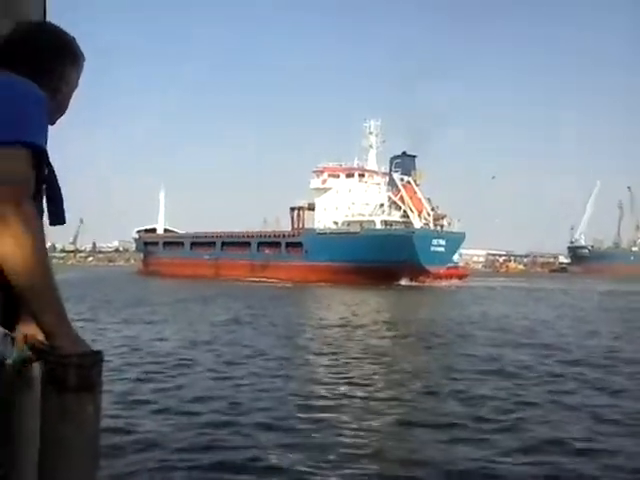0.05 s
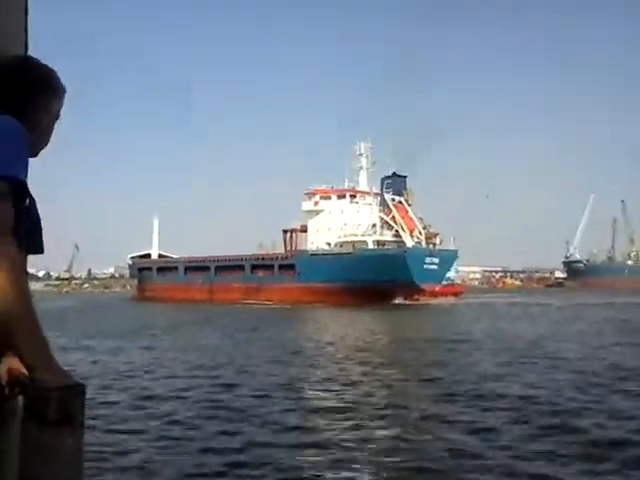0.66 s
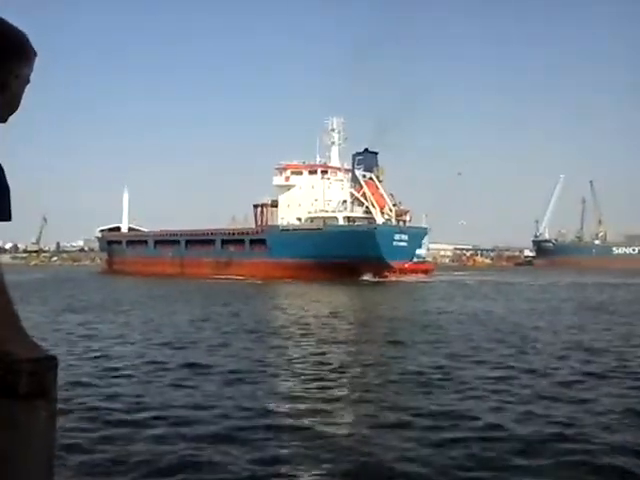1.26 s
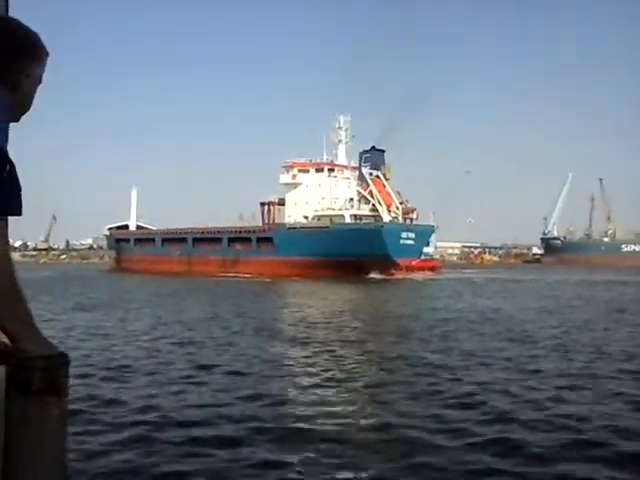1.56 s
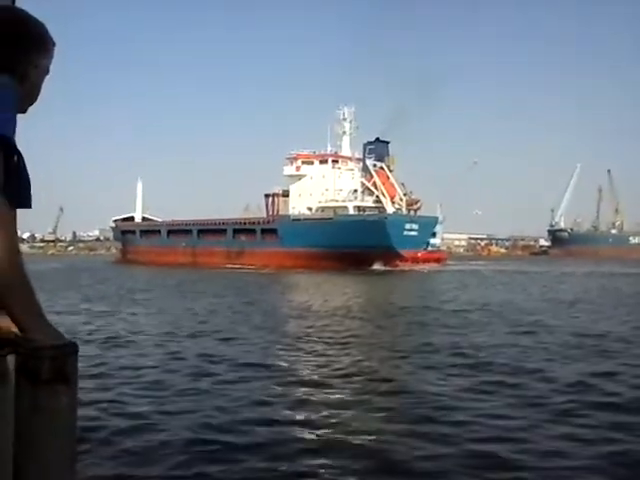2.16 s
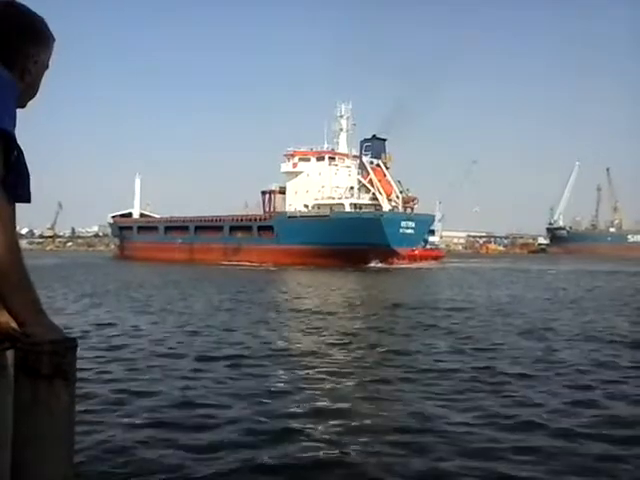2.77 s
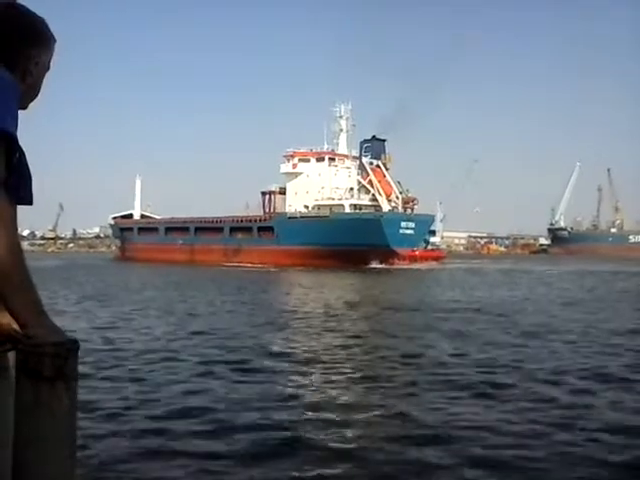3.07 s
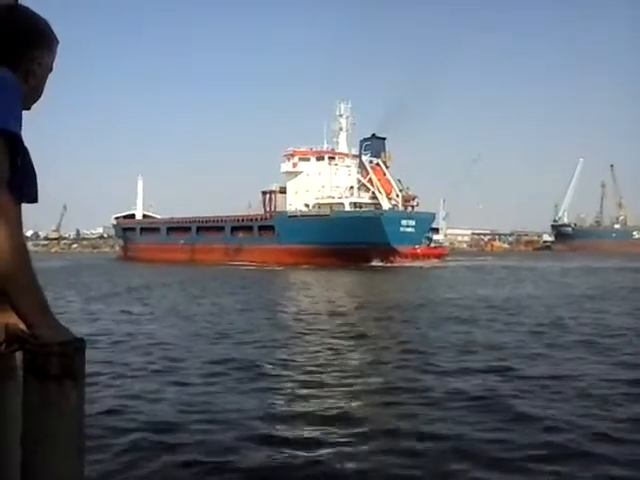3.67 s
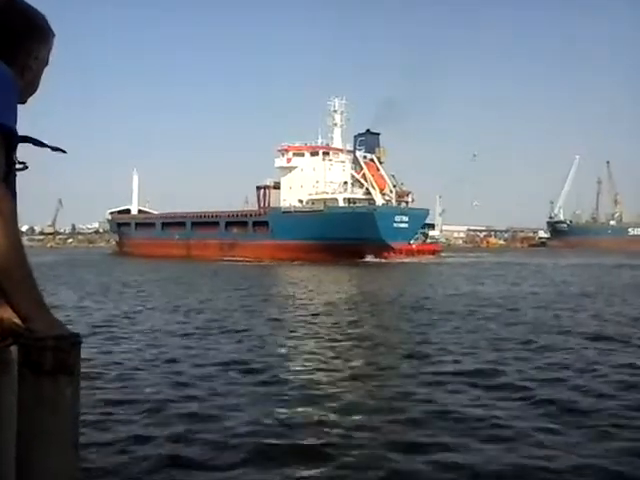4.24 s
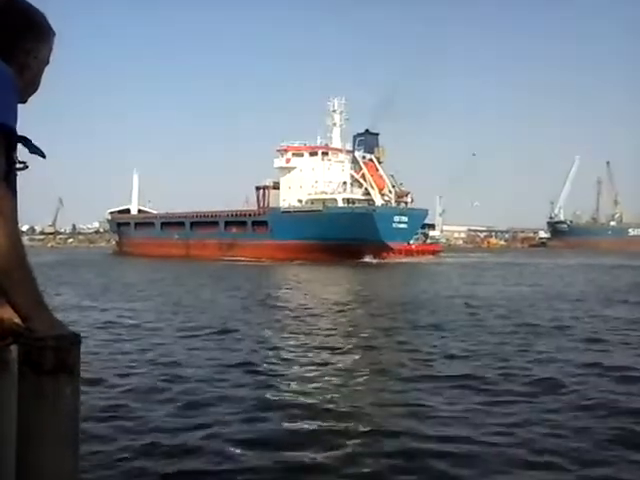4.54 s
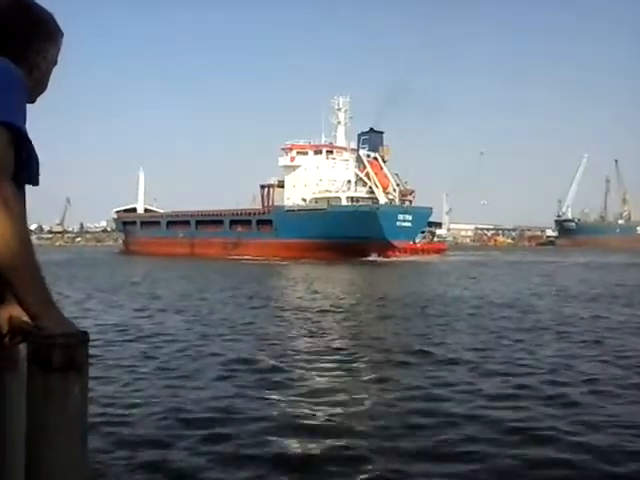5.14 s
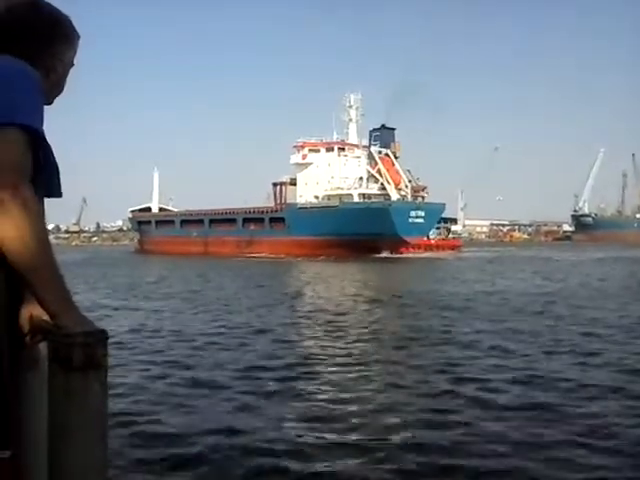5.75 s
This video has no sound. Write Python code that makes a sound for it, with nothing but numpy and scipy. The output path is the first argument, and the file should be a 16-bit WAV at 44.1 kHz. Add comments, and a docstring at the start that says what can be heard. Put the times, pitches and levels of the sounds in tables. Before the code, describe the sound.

A cargo ship's diesel engine drones and rumbles throughout, heard across harbour water from the quay and fading only slightly. Its fans whirr above it, clearest around 2 seconds, then recede. Churned water hisses with a quick throb, surging at the start and around 1.7, 2.5 and 4.2 seconds. A few faint, brief rustles sound close by in the first second, again just before 3 seconds and at about 4.2, with one small tick at about 1.2 seconds. Wind rumbles on the microphone, with gusts and scattered soft pops near 1.2, 1.9, 2.6 and 3.9 seconds. It keeps rising, and from about 5 seconds a strong gust breaks into rapid, irregular pops and deep buffeting. This dominates until the end at 6 seconds, while the overall volume is pulled down a little.

```python
"""A cargo ship leaving the harbour

Heard from the quay, a ship moves slowly away: its diesel drones, its fans whirr, and the water it
churns up (the wash) surges and throbs. A rising wind rumbles on the microphone. Near the end a gust
breaks into pops, and the camera's gain control turns everything down.
A few small rustles and one tick sound close by."""
import sys
import numpy as np
from scipy import signal
from scipy.fft import rfft, irfft, next_fast_len
from scipy.io import wavfile
from scipy.ndimage import uniform_filter1d, map_coordinates

SR = 44100
rng = np.random.default_rng(int(sys.argv[2]) if len(sys.argv) > 2 else 0)


def wrap_up_sound(samples):
    """Save the sound to the file named by the first command line argument, as 16-bit audio."""
    columns = np.atleast_2d(samples).T
    # keep every value between -1 and 1, then stretch to whole-number steps
    tamed = np.clip(columns, -1, 1)
    steps = np.round(tamed * 32767).astype(np.int16)
    wavfile.write(sys.argv[1], SR, steps)


N = 265041
TIME = np.arange(N) / SR
FIRING_HZ = 29.87  # how often the engine fires
THROB_HZ, THROB_CREST_S = 10.067, -.006

# strength of the wind between gusts: t/s, level/dB
WIND_STRENGTH = [(0, -37.5), (.9, -33.5), (2.85, -30), (3.6, -28), (4.3, -27), (5, -23.5), (5.55, -18),
                 (6.01, -20)]
# gusts: t/s, lift/dB, half length/s
WIND_GUSTS = [(1.194, 5.5, 0.13), (1.874, 6, 0.21), (2.619, 7.5, 0.1), (3.068, 3, 0.049), (3.6, 4.5, 0.032),
              (3.872, 5, .07), (4.578, 2, 0.079), (5.135, 9, 0.068), (5.328, 4.5, 0.03)]
# spectrum of the wind's deep rumble: f/Hz, level/dB
RUMBLE_SPECTRUM = [(20, -41), (36, -31.5), (55, -6.5), (82, 3), (110, -0.5), (170, -7), (260, -20),
                   (500, -40.5), (1500, -77.5)]
# spectrum of the wind's ragged edge: f/Hz, level/dB
EDGE_SPECTRUM = [(60, -13.5), (140, 1.5), (260, 1), (400, -6), (650, -15.5), (1000, -22), (1600, -33),
                 (4000, -78)]
# eddies (swirls of air) that pop on the microphone: t/s, level/dB, f at the core/Hz, half length/cycles
EDDY_POPS = [(1.1746, -9.5, 319, 0.72), (1.235, -11, 225, 0.73), (1.479, -12, 245, 0.83),
             (1.8622, -8, 272, 0.72), (2.665, -16, 229, 1.77), (3.599, -19, 300, 1.1),
             (3.938, -14.5, 293, 0.62), (4.323, -14.5, 288, 0.63), (4.630, -9.5, 243, .8),
             (4.72, -10, 232, 0.68), (4.843, -20, 562, .8), (4.908, -23, 573, .7),
             (5.039, -14.5, 355, 0.78), (5.106, -2.5, 405, 4.2), (5.182, -11.5, 387, 1.4),
             (5.209, -9.5, 272, .8), (5.245, -16, 534, 1.2), (5.309, -6, 516, 3.37), (5.342, -4, 234, .55),
             (5.364, -7, 124.3, .7), (5.492, -16, 512, 1), (5.586, -5.5, 468, 0.42), (5.623, -6, 415, 0.65),
             (5.680, -5, 442.5, 0.78), (5.685, -11.5, 151.6, 1.2), (5.775, -12, 530, 1.04),
             (5.786, -6, 136.6, 1.4), (5.835, -10.5, 335, 0.69), (5.850, -3.5, 498.5, 0.96)]
# close rustles: t/s, level/dB, centre f/Hz, width/octaves, half length/s
CLOSE_RUSTLES = [(0.009, -34.5, 5900, 0.21, 0.015), (.095, -41.5, 6400, .25, 0.008),
                 (0.126, -41.5, 4500, 1, 0.031), (0.505, -45.5, 4130, 0.87, 0.05),
                 (.768, -43, 6800, .22, 0.0085), (.913, -45, 6500, .2, 0.0088),
                 (2.76, -47, 5400, .4, 0.0054), (2.868, -50, 3500, 0.5, 0.013),
                 (4.165, -45, 3970, .25, 0.018)]
# ringing tones of the tick: f/Hz, level/dB, time to fall by 60 dB/s
TICK_MODES = [(1090, -21, 0.008), (3720, -22.5, 0.0055), (4430, -23, 0.0049), (5340, -23.5, 0.0055),
              (6830, -25.5, 0.0052)]
# spectrum of one fan's narrow whirr: f/Hz, level/dB
WHIRR_SPECTRUM = [(1700, -41), (2000, -6), (2170, 0), (2350, -7.5), (2700, -40.5)]
# spectrum of the ventilation fans: f/Hz, level/dB
FAN_SPECTRUM = [(900, -25), (1550, -4), (1850, -2), (2100, -.3), (2300, -8.5), (2550, -13), (4000, -38)]
# spectrum of the churned water: f/Hz, level/dB
WASH_SPECTRUM = [(500, -9), (1500, -3), (2700, -1), (3200, 0), (3780, 3), (4300, -1.5), (4800, -4.5),
                 (5600, -1), (6500, -2.5), (7150, -5.5), (7700, -23), (8700, -23.5)]
# surges of the wash: t/s, lift/dB, rise/s, fall/s
WASH_SURGES = [(.1, 3.5, 0.28, 0.26), (1.65, 4, 0.42, 0.31), (2.55, 2, 0.35, .7), (4.16, 4, 0.18, 0.39),
               (5, 1, .15, .2)]
# spectrum of the engine's roar: f/Hz, level/dB
ROAR_SPECTRUM = [(30, -18), (55, 17.5), (110, 17.5), (180, 22.5), (330, 6.5), (430, 7.5), (650, 9),
                 (900, 1), (1080, 3.5), (1280, -1), (1500, -13), (2500, -25), (8000, -72)]
# hum of the ship's smaller machines: f/Hz, level/dB
HUM_TONES = [(243.9, -53.5), (265.8, -46.5), (293.4, -47.5), (531.5, -63)]
# exhaust tones: multiple of the firing rate, level/dB
EXHAUST_TONES = [(1, -60), (2, -40.5), (3, -38.5), (4, -50.5), (6, -43.5), (7, -50)]


def amp(db):
    """Turn decibels into a factor to multiply by."""
    return 10 ** (np.asarray(db) / 20)


def unit(x):
    """Scale x to an average size (rms) of 1."""
    return x / np.sqrt(np.mean(x ** 2) + 1e-20)


def swell(at_s, rise_s, fall_s):
    """A smooth hump that reaches height 1 at time at_s."""
    return np.exp(-((TIME - at_s) / np.where(TIME < at_s, rise_s, fall_s)) ** 2)


def wobble(per_s):
    """A smooth curve through per_s random values a second."""
    return map_coordinates(rng.standard_normal(int(N * per_s / SR) + 4), [TIME * per_s])


def filtered(x, response):
    """Multiply each frequency in x by response(hz)."""
    size = next_fast_len(N + SR // 2)
    return irfft(rfft(x, size) * response(np.fft.rfftfreq(size, 1 / SR)), size)[:N]


def coloured(x, spectrum):
    """Shape x with a spectrum table, then scale it to rms 1."""
    points_hz, db = np.transpose(spectrum)
    return unit(filtered(x, lambda hz: amp(np.interp(np.log(hz + 1), np.log(points_hz), db))))


def turbulence(lump_db, per_s):
    """White noise whose loudness comes in random lumps."""
    return rng.standard_normal(N) * amp(lump_db * wobble(per_s))


def wind(rumble_db, edge_db, calm_edge_db):
    """Large eddies rumble on the microphone; small ones add a flutter that grows ragged in gusts."""
    gusts_db = sum(lift * swell(at_s, half_s, half_s) for at_s, lift, half_s in WIND_GUSTS)
    strength_db = np.interp(TIME, *np.transpose(WIND_STRENGTH)) + gusts_db
    rumble = coloured(turbulence(lump_db=0.45, per_s=27), RUMBLE_SPECTRUM)
    edge = coloured(turbulence(lump_db=3.0, per_s=130), EDGE_SPECTRUM)
    edge_gain = np.hypot(amp(calm_edge_db), amp(strength_db + edge_db))
    return rumble * amp(strength_db + rumble_db) + edge * edge_gain


def eddies(wander, slowing, sharpness, port_hz, gain_db):
    """Each eddy shakes the air at the microphone's opening (port): fast at its core, slower at its rim."""
    pops = np.zeros(N)
    t = np.arange(-SR // 25, SR // 25) / SR
    for at_s, db, core_hz, cycles in EDDY_POPS:
        core = np.exp(-np.abs(t * core_hz / cycles) ** 1.38)
        unrest = map_coordinates(rng.standard_normal(96), [(t - t[0]) * 800])
        swing_hz = core_hz * np.exp(wander * unrest - slowing * (1 - core))
        phase = 2 * np.pi * (np.cumsum(swing_hz) / SR + rng.random())
        # the swing is lopsided: pointed tops and round bottoms
        swing = np.cos(phase) + sharpness * np.cos(2 * phase)
        start = round((at_s + t[0]) * SR)
        pops[start:start + len(t)] += amp(db + gain_db) * core * swing
    # the port holds back the slowest and the fastest part of the swing
    port = lambda hz: hz ** 2 / np.hypot(hz ** 2, 55 ** 2) / np.hypot(1, (hz / port_hz) ** 6)
    return filtered(pops, port)


def rustles():
    """Short soft hisses close to the microphone."""
    hisses = np.zeros(N)
    for at_s, db, centre_hz, octaves, half_s in CLOSE_RUSTLES:
        def band(hz):
            bell = np.exp(-.5 * (np.log2((hz + 1) / centre_hz) / octaves) ** 2)
            return bell / np.hypot(1, (hz / 7200) ** 30)
        hiss = unit(filtered(rng.standard_normal(N), band))
        hisses += hiss * amp(db) * swell(at_s, half_s, half_s)
    return hisses


def tick(at_s, attack_s, gain_db):
    """One small hard contact rings for a few milliseconds."""
    t = np.maximum(TIME - at_s, 0)
    # neighbouring tones start in opposite directions
    ring = sum((-1) ** k * amp(db - 60 * t / ring_s) * np.sin(2 * np.pi * hz * t)
               for k, (hz, db, ring_s) in enumerate(TICK_MODES))
    return ring * (1 - np.exp(-t / attack_s)) * amp(gain_db)


def whirr(level_db, loudest_s, half_s):
    """One fan's narrow whirr carries over the water for a few seconds."""
    noise = coloured(turbulence(lump_db=2.5, per_s=18), WHIRR_SPECTRUM)
    return noise * amp(level_db) * swell(loudest_s, half_s, half_s)


def fans_and_wash(fans_db, wash_db, fans_fade_db_per_s, fans_share, calm_throb_db, throb_per_surge):
    """The fans fade as the ship leaves; in a surge, fans and fizzing water get louder and throb more."""
    surge_db = sum(lift * swell(at_s, rise_s, fall_s) for at_s, lift, rise_s, fall_s in WASH_SURGES)
    phase = 2 * np.pi * THROB_HZ * (TIME - THROB_CREST_S)
    # each throb is a short peak followed by a longer dip
    throb = np.cos(phase) + 0.52 * np.cos(2 * phase)
    depth_db = calm_throb_db + throb_per_surge * surge_db
    fans = coloured(rng.standard_normal(N), FAN_SPECTRUM)
    fans *= amp(fans_db - fans_fade_db_per_s * TIME + fans_share * surge_db)
    wash = coloured(turbulence(lump_db=0.78, per_s=160), WASH_SPECTRUM) * amp(wash_db + surge_db)
    one_fan = whirr(level_db=-52.0, loudest_s=1.77, half_s=1.2)
    return (fans + wash + one_fan) * amp(depth_db * throb)


def tone(hz, db, drift_rad, waver_db):
    """A steady tone whose phase and level waver on the way over the water."""
    phase = 2 * np.pi * (hz * TIME + rng.random()) + drift_rad * wobble(1.3)
    return np.sqrt(2) * amp(db + waver_db * wobble(3)) * np.sin(phase)


def diesel():
    """The funnel drones at low multiples of the firing rate; other machines hum beside it."""
    exhaust = sum(tone(k * FIRING_HZ, db, drift_rad=0.099, waver_db=1.2) for k, db in EXHAUST_TONES)
    hum = sum(tone(hz, db, drift_rad=0.28, waver_db=2.0) for hz, db in HUM_TONES)
    return exhaust + hum


def engine_roar(level_db, fade_db_per_s, chug_db, waver_db):
    """The engine's roar swells a little with every firing and fades slowly as the ship moves away."""
    chug = np.cos(2 * np.pi * FIRING_HZ * TIME)
    roar = coloured(turbulence(lump_db=1.5, per_s=40), ROAR_SPECTRUM)
    return roar * amp(level_db - fade_db_per_s * TIME + chug_db * chug + waver_db * wobble(4))


def scene():
    """The far ship, the wind and the small close sounds, added into one channel."""
    ship = diesel() + engine_roar(level_db=-31.0, fade_db_per_s=0.24, chug_db=.5, waver_db=1.0)
    ship += fans_and_wash(fans_db=-48.5, wash_db=-49.0, fans_fade_db_per_s=0.86,
                          fans_share=0.33, calm_throb_db=.5, throb_per_surge=.38)
    air = wind(rumble_db=-0.5, edge_db=-10.5, calm_edge_db=-35.5)
    air += eddies(wander=.28, slowing=.9, sharpness=0.16, port_hz=900, gain_db=-0.5)
    close = rustles() + tick(at_s=1.1522, attack_s=0.00047, gain_db=4.5)
    return (ship + air + close)[None]


def gain_control(x, threshold_db, max_cut_db, attack_s, release_db_per_s):
    """Sound louder than the threshold turns the volume down; it creeps back up afterwards."""
    level_db = 10 * np.log10(np.abs(uniform_filter1d(x ** 2, size=SR // 10)) + 1e-12)
    wanted_cut_db = np.clip(level_db - threshold_db, 0, max_cut_db)
    recovery_db = release_db_per_s * TIME
    cut_db = np.maximum.accumulate(wanted_cut_db + recovery_db) - recovery_db
    keep = np.exp(-1 / (attack_s * SR))
    smooth_cut_db = signal.lfilter([1 - keep], [1, -keep], cut_db)
    return x * amp(-smooth_cut_db)


def record(dry):
    """The camera turns loud moments down, softens the high treble and drops everything above it."""
    held = gain_control(dry[0], threshold_db=-19.0, max_cut_db=4.0, attack_s=0.099, release_db_per_s=5.5)
    return filtered(held, lambda hz: (hz < 8800) / np.hypot(1, (hz / 7900) ** 12))[None]


dry = scene()
out = record(dry)
wrap_up_sound(out)
```